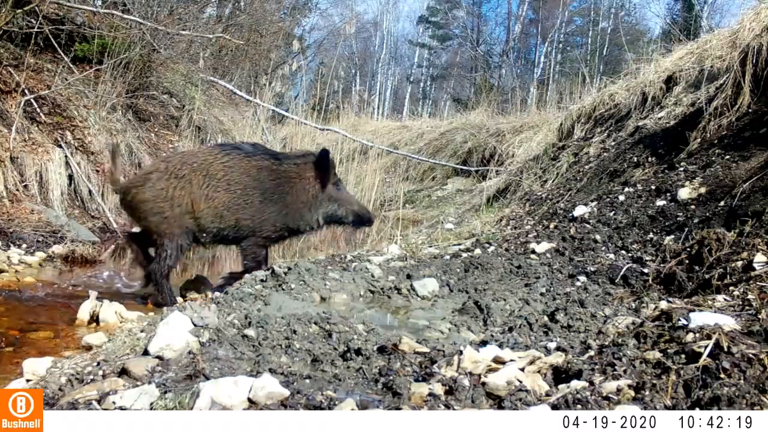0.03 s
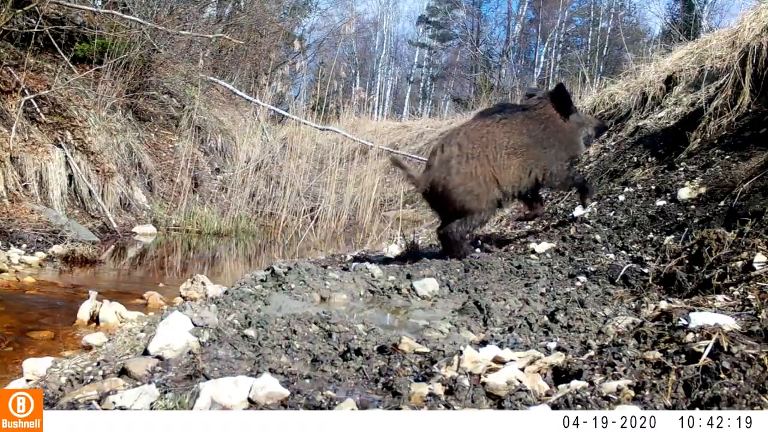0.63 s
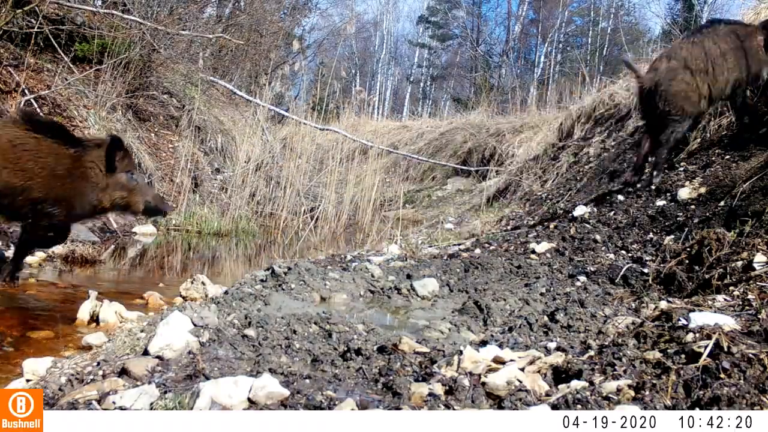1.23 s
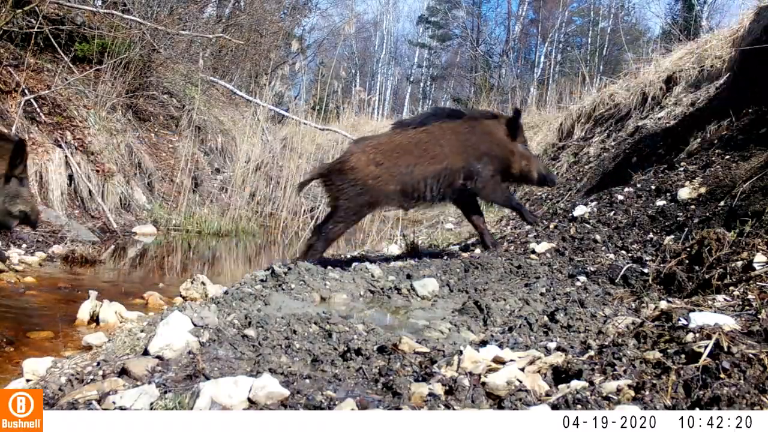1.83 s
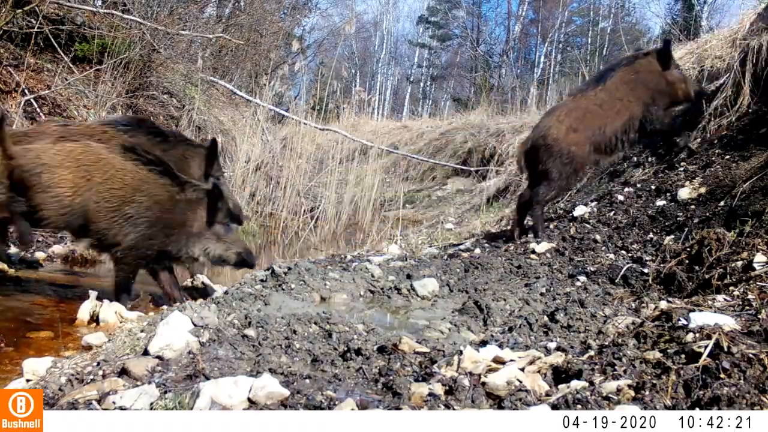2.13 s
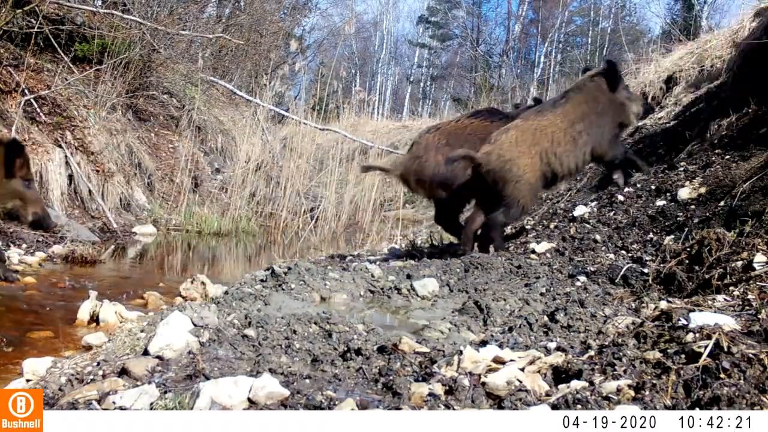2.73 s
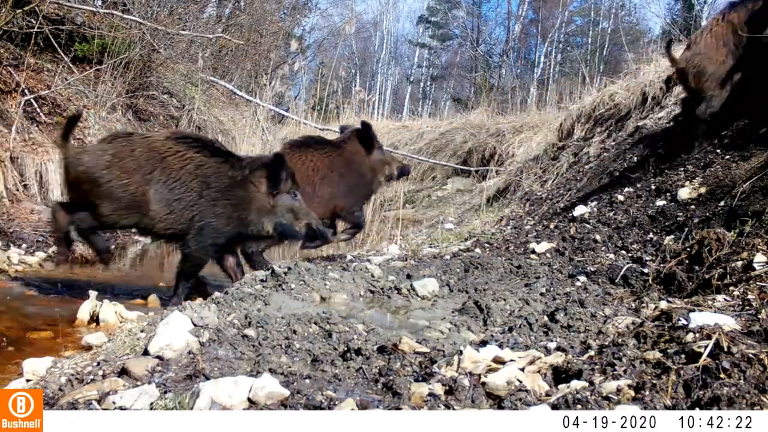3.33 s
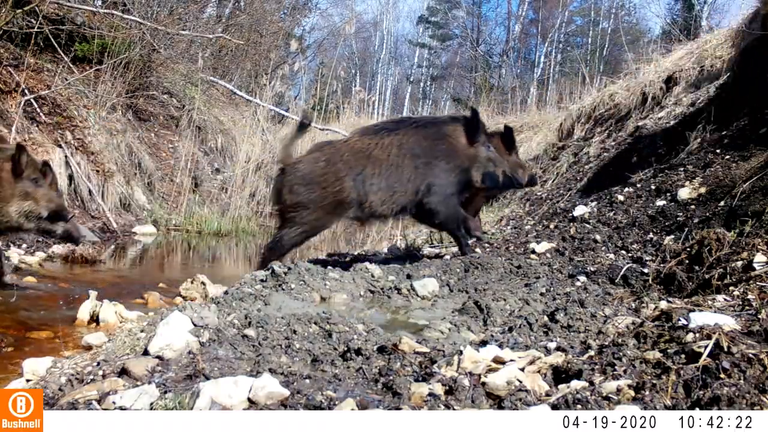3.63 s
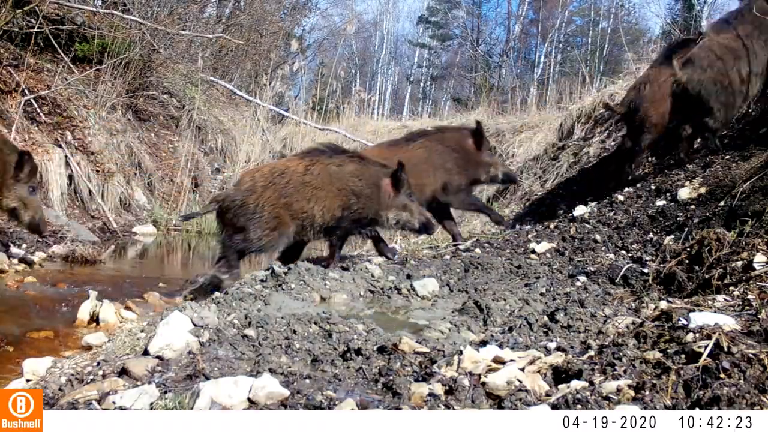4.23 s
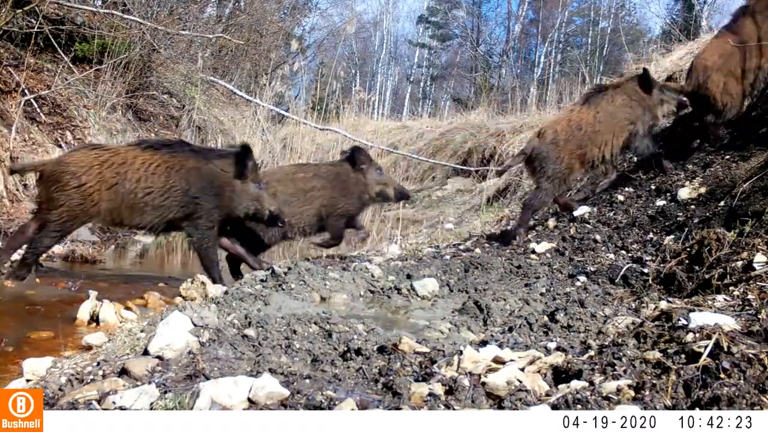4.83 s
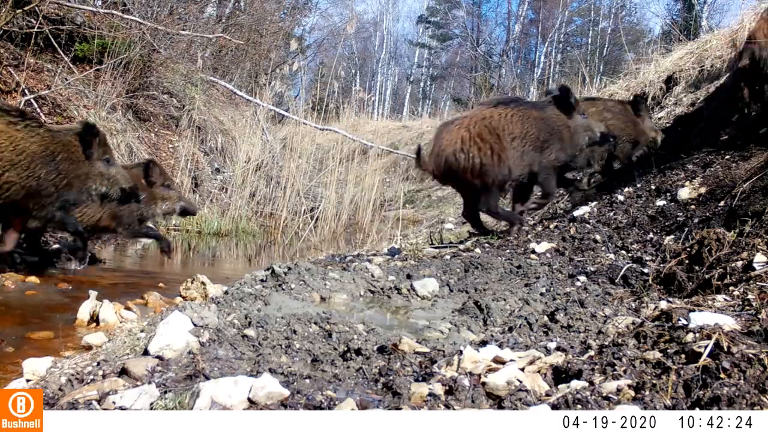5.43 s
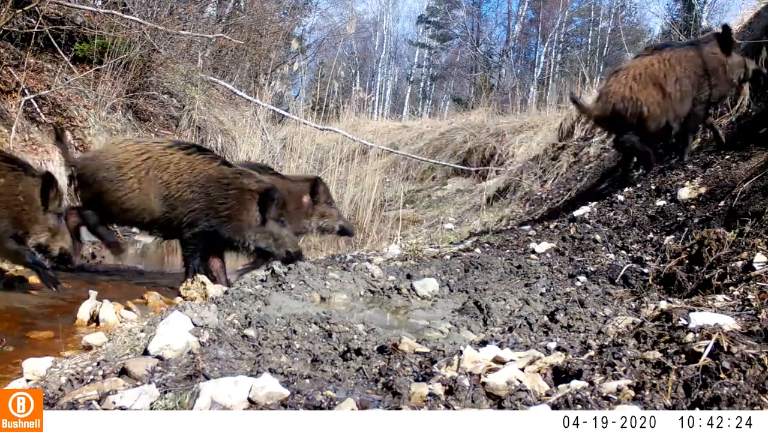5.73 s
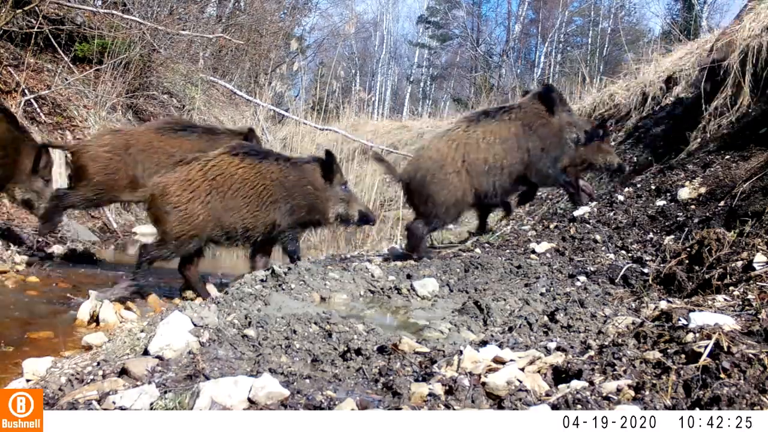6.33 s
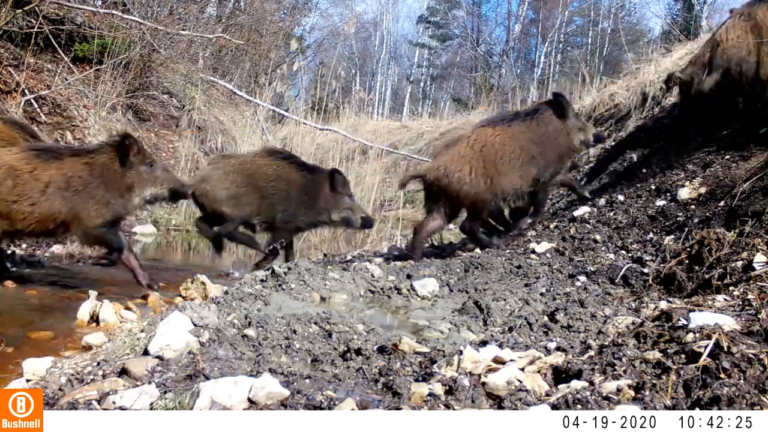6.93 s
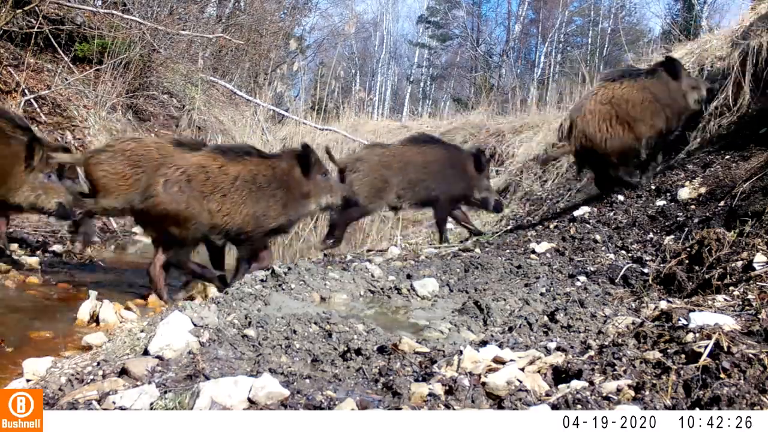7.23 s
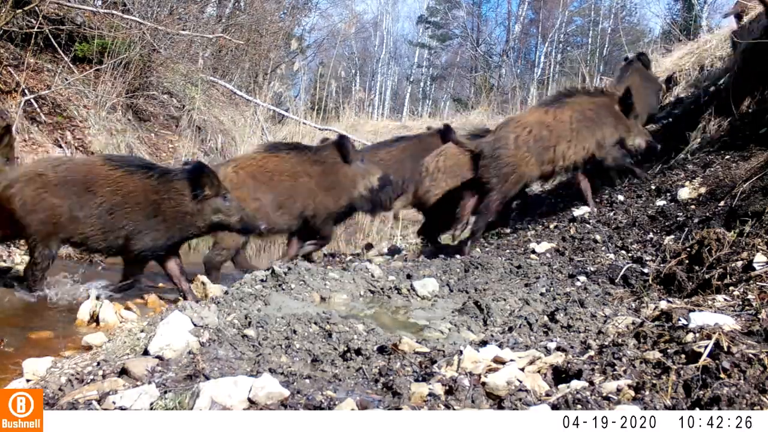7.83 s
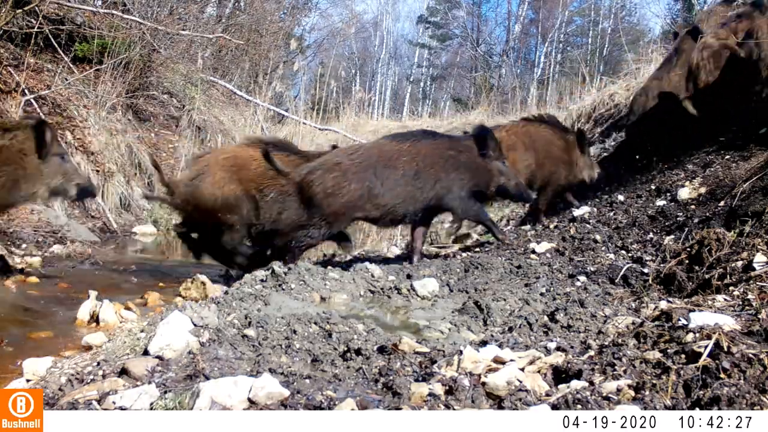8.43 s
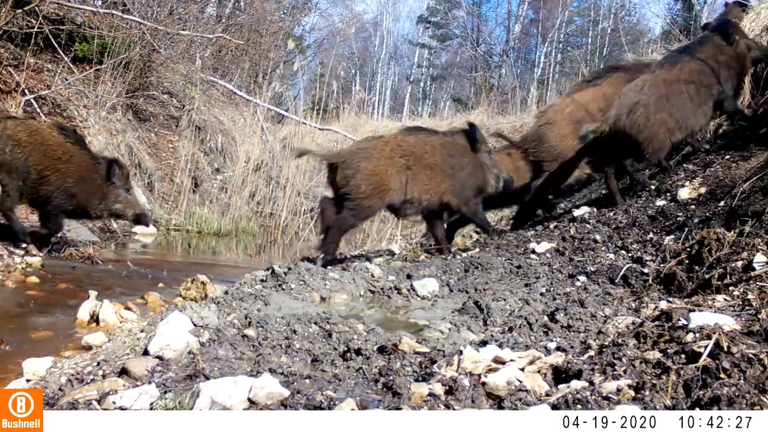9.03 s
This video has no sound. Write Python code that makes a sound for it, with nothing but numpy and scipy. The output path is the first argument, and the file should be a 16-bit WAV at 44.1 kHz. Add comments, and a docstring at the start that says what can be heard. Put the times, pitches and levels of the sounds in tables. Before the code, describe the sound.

Hooves clack on loose stones, plop and crunch as wild boar cross shallow water, over soft sloshing and faint hiss.

```python
"""A shallow stream under a gravel bank: a herd of wild boar trots through, close to a small trail camera.
Hooves knock stones together, plop into the water and thud into mud. Each clear step stirs up bubbles
and loose gravel, over the steady churning of the herd and a faint tremble of the ground.
The banks throw back short echoes; the camera's microphone is dull and its electronics hiss."""
import sys
import numpy as np
from scipy import signal
from scipy.fft import rfft, irfft
from scipy.io import wavfile
from scipy.ndimage import map_coordinates

SR = 44100
rng = np.random.default_rng(int(sys.argv[2]) if len(sys.argv) > 2 else 0)


def int16_out(signal):
    """Quantize to a 16-bit WAV file."""
    q = np.round(np.clip(np.atleast_2d(signal).T, -1, 1) * 32767)
    wavfile.write(sys.argv[1], SR, q.astype(np.int16))


N = 404838
TIME = np.arange(N) / SR

# Table levels are fader settings; a layer may add its own trim.
# hiss of the electronics: t/s, level/dB
HISS_LEVEL = [(0.1, -87), (0.56, -88), (0.62, -67), (0.68, -68.5), (0.8, -76), (1.0, -67.5), (2.0, -69),
              (4.3, -71.5), (5.5, -72.5), (6.3, -76.5), (7.7, -78.5), (9.18, -80.5)]
# the ground's steady tremble under the herd: t/s, level/dB
TREMBLE_LEVEL = [(0.3, -66), (0.89, -68), (5.74, -66), (9.15, -76)]
# a boar's weight jolts the ground nearby: t/s, level/dB, swell/s
GROUND_JOLTS = [(0.125, -56, 0.016), (0.597, -54, 0.018), (0.825, -59, 0.04), (0.95, -65, .04),
                (1.5, -63, 0.041), (1.742, -55, 0.014), (1.795, -55, 0.014), (2.892, -54, 0.0097),
                (3.355, -49, 0.0085)]
# EQ curves of the hiss, trembling ground, sloshing water and crunching gravel: f/Hz, level/dB
HISS_EQ = [(3000, -14), (6000, -7), (8200, 5.5), (10500, 6.5), (12500, 6.5), (15500, 4)]
TREMBLE_EQ = [(25, -11.5), (50, -4.5), (90, -5.5), (150, -4.5), (300, -12), (700, -33.5)]
WATER_EQ = [(30, -49), (70, -26), (130, -12.5), (200, -9), (330, -9.5), (500, -3), (750, -1.5), (1050, 3),
            (1400, -2), (2000, -10), (4000, -35)]
GRAVEL_EQ = [(500, -17.5), (1000, -8.5), (1400, -2.5), (1850, 1), (2400, -2.5), (3000, -1), (3800, -8),
             (4900, -11.5), (6000, -15.5), (8000, -4.5)]
# the herd's churning, which swells as more animals cross: t/s, water level/dB, gravel level/dB
CHURN_LEVELS = [(0.3, -50.5, -50.5), (1.28, -47, -47.5), (1.38, -43.5, -41), (1.85, -46, -46),
                (2.22, -39.5, -39), (2.89, -42.5, -40.5), (3.21, -42, -38), (3.43, -38, -41.5),
                (3.68, -43, -39.5), (3.92, -39, -38), (4.22, -40, -39), (4.64, -40, -38), (5.2, -41, -40),
                (6.04, -41.5, -41.5), (7.0, -45.5, -45.5), (8.34, -44.5, -44.5), (8.75, -47, -48),
                (9.15, -45.5, -46)]
# a boar pushes through the shallows or slips: middle t/s, half length/s, water level/dB, gravel level/dB
BOAR_LUNGES = [(0.143, 0.12, -49.5, -50), (0.718, 0.14, -44.5, -47.5), (0.955, 0.07, -43.5, -45),
               (1.215, 0.06, -39, -43), (1.345, 0.026, -37.5, -35.5), (1.634, 0.04, -45, -45),
               (2.344, 0.036, -51, -38), (3.182, 0.035, -44, -38), (3.692, 0.045, -38, -44),
               (4.27, 0.031, -42, -54), (4.391, 0.015, -59, -38), (4.815, 0.11, -41, -58),
               (5.724, 0.025, -41, -40.5), (5.96, 0.027, -44, -43), (6.046, 0.02, -36.5, -47),
               (6.138, 0.014, -38, -38), (6.72, 0.028, -39.5, -40.5), (6.868, 0.073, -43.5, -51),
               (7.32, 0.066, -44.5, -44.5), (7.753, 0.018, -39.5, -39.5), (7.912, 0.027, -37, -37.5),
               (8.183, 0.025, -37, -39.5), (8.553, 0.032, -41, -45.5), (8.77, 0.04, -45, -44.5),
               (8.93, 0.011, -48, -46)]
# a leg drags through the water: middle t/s, level/dB, bubble f/Hz, half length/s
LEG_GURGLES = [(1.247, -44, 500, 0.06), (1.359, -24, 1690, 0.014), (1.553, -33, 1210, 0.019),
               (2.175, -26, 1000, 0.022), (2.275, -27, 900, 0.034), (2.716, -35, 1000, 0.012),
               (3.101, -33.5, 555, 0.019), (3.11, -38, 1130, 0.021), (3.219, -26.5, 1102, 0.084),
               (3.945, -28, 898, 0.02), (4.062, -20.5, 1049, 0.014), (5.258, -29.5, 810, 0.024),
               (5.581, -25.5, 1372, 0.014), (5.849, -32, 910, 0.014), (5.924, -36.5, 533, 0.015),
               (6.206, -29, 1080, 0.035), (6.285, -29, 990, 0.016), (7.701, -32, 1117, 0.023),
               (7.806, -32, 730, 0.01), (7.909, -33.5, 1010, 0.031)]
# a hoof punches one air pocket into the water: t/s, level/dB, f/Hz
AIR_PLOPS = [(0.121, -40, 1000), (0.198, -42, 950), (0.484, -43.5, 443), (0.617, -38, 684),
             (0.675, -33.5, 930), (1.528, -25.5, 1050), (2.137, -29, 932), (2.169, -27.5, 936),
             (2.259, -32, 820), (3.035, -16, 1091), (3.102, -25, 1139), (3.453, -24.5, 1095),
             (3.838, -25, 1070), (3.967, -26, 860), (4.005, -26.5, 930), (4.089, -24, 915),
             (4.288, -28, 1090), (4.317, -27.5, 1180), (4.416, -28, 906), (4.474, -25, 1010),
             (4.519, -24, 626), (4.561, -25, 1200), (4.564, -26, 684), (4.785, -27, 986),
             (6.158, -20.5, 990), (6.198, -27, 850), (7.685, -22.5, 1106), (7.749, -28, 534),
             (7.753, -28, 1080), (7.806, -35, 1110), (7.924, -22.5, 1030), (8.325, -36, 1090),
             (8.417, -39, 1020)]
# a deep plunge throws up clods and water: t/s, level/dB, centre f/Hz, decay/s
DEEP_PLUNGES = [(4.247, -24.5, 1190, 0.014), (4.524, -25, 900, 0.017), (4.561, -25, 910, 0.01),
                (8.347, -30, 950, 0.0089)]
# a kicked pebble snaps against another: t/s, level/dB, f/Hz
KICKED_PEBBLES = [(1.1626, -25, 1460), (2.0264, -19, 3020), (3.027, -20, 1920), (3.339, -23, 2460),
                  (4.7704, -21, 2070), (4.953, -22, 1390), (5.5424, -20, 2890), (6.393, -31, 2200),
                  (6.531, -28, 1900), (6.5593, -25, 1830), (6.583, -28, 2000), (6.7067, -30, 1610),
                  (6.754, -25, 1510), (6.798, -26, 2100), (6.8643, -21, 2500), (7.42, -23, 1900),
                  (7.5069, -22, 3250), (7.5487, -26, 1916), (7.6428, -23, 1905), (7.773, -21.5, 3300),
                  (8.0117, -23.5, 1930), (8.0318, -30, 2410), (8.1717, -18.5, 1780), (8.327, -20, 1700),
                  (8.429, -23, 1300), (8.5549, -23, 1480), (8.606, -20, 2200), (8.6221, -22.5, 1440),
                  (8.7406, -24, 2110), (8.921, -27, 2600), (8.933, -26.5, 1390), (9.0501, -24, 2920)]
# a hoof tips a flat stone: t/s, level/dB, f/Hz, t60/s
TIPPED_STONES = [(0.6965, -32, 2400, 0.025), (3.157, -26, 5100, 0.044), (4.2428, -7, 2640, 0.013),
                 (4.5397, -26, 2940, 0.027), (7.548, -24, 3000, 0.023), (7.549, -32, 4450, 0.059),
                 (7.6835, -23, 2842, 0.035), (7.906, -26, 1830, 0.043), (8.356, -30, 2380, 0.027),
                 (8.403, -22.5, 2890, 0.018)]
# heavy footfalls in mud and soft ground: t/s, level/dB, final f/Hz
MUD_THUDS = [(0.617, -44, 110), (1.146, -36, 308), (1.678, -20.5, 462), (2.899, -24.5, 288),
             (3.361, -18.5, 230), (4.241, -7, 665), (6.039, -30.5, 260), (8.401, -18, 647)]
# the clearest steps on stone or in water: t/s, knock level/dB, f/Hz, grit and clack level/dB,
# spray level/dB relative to the knock
CLEAR_STEPS = [(0.129, -30.5, 1300, -46, -17), (0.229, -30, 1570, -39, -19), (0.405, -29.5, 1350, -47, -29),
               (0.696, -33, 1920, -27, -3), (1.342, -16.5, 1820, -24, -8.5), (1.526, -24.5, 1160, -49, 0),
               (1.575, -21.5, 1830, -50, -22), (1.799, -29, 1090, -36.5, -10),
               (1.902, -21.5, 1110, -34, -8.5), (1.908, -20, 1840, -45, -27),
               (1.939, -19.5, 1780, -47, -6.5), (2.018, -22, 1070, -38, -10),
               (2.024, -23.5, 945, -28.5, -19), (2.137, -26, 950, -36, -27), (2.157, -25, 1130, -47, -1),
               (2.32, -11, 1600, -29, -16), (2.849, -18, 2970, -47, -13), (2.997, -12, 1210, -31, -9),
               (3.035, -23.5, 1043, -22, -1), (3.045, -12.5, 1814, -20, -21), (3.154, -31, 2600, -21, -4),
               (3.184, -13.5, 3300, -23, -21), (3.237, -28, 1140, -26, -20), (3.36, -16, 984, -55, -12),
               (3.58, -20, 1940, -37, -27), (3.625, -32, 1050, -25.5, -21),
               (3.676, -17.5, 1900, -27.5, -16), (3.807, -19.5, 1130, -31, -3),
               (3.836, -14, 1446, -27, -32), (3.842, -6.5, 1800, -41, -11), (3.87, -14.5, 1854, -38, -16),
               (3.965, -17.5, 1580, -29, -1), (4.004, -20.5, 1080, -26.5, -2),
               (4.088, -15.5, 1150, -32, -10), (4.232, -22, 2900, -21, -26), (4.2412, 1.5, 1966, -34, -29),
               (4.301, -19, 2750, -27, -26), (4.316, -11, 2840, -42, -24), (4.433, -16.5, 1550, -35, -20),
               (4.5193, -9, 1015, -47, -12), (4.558, -13.5, 1190, -53, -19), (4.626, -19.5, 2007, -32, -11),
               (4.659, -14.5, 1830, -47, -11), (4.783, -14, 1980, -47, -16), (4.95, -21.5, 1270, -49, -7.5),
               (5.394, -22, 2800, -52, -26), (5.54, -27, 1447, -26, -26), (6.047, -31, 1200, -30.5, -12),
               (6.158, -29, 1082, -31, -1), (6.196, -15, 1820, -32, -9), (6.392, -48, 2250, -30, -17),
               (6.529, -33, 1940, -40, -2), (6.582, -21.5, 3420, -36, -18), (6.753, -31, 1050, -32.5, -19),
               (6.878, -31, 945, -31.5, -20), (6.927, -29.5, 1890, -47, -6), (7.1, -16, 1660, -38, -24),
               (7.116, -25, 1620, -31.5, -24), (7.265, -33, 1840, -34.5, -8), (7.313, -30, 970, -31.5, -11),
               (7.384, -23.5, 2870, -53, -33), (7.409, -30, 1160, -47, -26), (7.548, -16.5, 1510, -24, -22),
               (7.641, -24, 2200, -39, -9), (7.681, -32, 1079, -50, -13), (7.686, -21.5, 1600, -35, -7),
               (7.772, -31, 830, -41, -35), (7.803, -25, 1126, -44, -0.5), (7.904, -23, 1460, -41, -3.5),
               (8.012, -27.5, 890, -35.5, -2.5), (8.169, -15.5, 1860, -53, -30),
               (8.197, -16.5, 1850, -44, -13), (8.268, -25, 1110, -35, -2), (8.325, -25, 1060, -50, -25),
               (8.354, -23, 1880, -39, -27), (8.402, -15, 2650, -45, -24), (8.554, -30, 1560, -41, -4),
               (8.606, -20, 1740, -28, -12), (8.973, -24.5, 1530, -54, -21)]
STEP_REF_DB = -20  # a middling step; stirs and thumps are scaled from it


def from_db(db):
    """Decibels to gain."""
    return 10 ** (np.asarray(db) / 20)


def unit_rms(x):
    """Scale to unit power."""
    return x / np.sqrt(np.mean(x ** 2) + 1e-20)


def unit_peak(x):
    """Scale to unit height."""
    return x / (np.abs(x).max() + 1e-20)


def automation(rows):
    """Each level column of a timed table, drawn out to every sample."""
    times, *columns = np.transpose(rows)
    return [np.interp(TIME, times, column) for column in columns]


def equalise(x, curve):
    """Shape a steady sound with an EQ curve on a log-frequency axis; unit power."""
    hz, level_db = np.transpose(curve)
    bins_hz = np.maximum(np.fft.rfftfreq(N, 1 / SR), 1)
    gain = from_db(np.interp(np.log(bins_hz), np.log(hz), level_db))
    return unit_rms(irfft(rfft(x) * gain, N))


def butter(x, hz, kind, order=2):
    """Causal Butterworth filter."""
    sos = signal.butter(order, np.clip(hz, 10, .45 * SR), kind, fs=SR, output="sos")
    return signal.sosfilt(sos, x + 1e-18)


def drift(per_s):
    """Smooth random wander of unit power."""
    knots = rng.standard_normal(4096)
    return unit_rms(map_coordinates(knots, [TIME * per_s], order=1, mode="wrap"))


def add(out, start_s, sound):
    """Mix a sound in at a time."""
    at = int(np.clip(round(start_s * SR), 0, N - 1))
    out[at:at + len(sound)] += sound[:N - at]


def clicks(per_s, spread_db, size):
    """Random contacts: many faint ones, a few strong."""
    born = rng.random(size) < per_s / SR
    strength = from_db(spread_db * np.minimum(rng.exponential(1, size), 4))
    return born * strength * rng.choice([-1, 1], size)


def grains(per_s, spread_db, low_hz, high_hz, cycles, count=20):
    """Contacts dealt to resonators of many sizes, each dying by 60 dB in `cycles`; unit power."""
    contacts = clicks(per_s, spread_db, N)
    dealt_to = rng.integers(0, count, N)
    out = np.zeros(N)
    for k, hz in enumerate(np.geomspace(low_hz, high_hz, count)):
        radius = from_db(-60 * hz / (cycles * SR))
        feedback = [1, -2 * radius * np.cos(2 * np.pi * hz / SR), radius ** 2]
        out += np.sqrt(hz) * signal.lfilter([1, 0, -1], feedback, contacts * (dealt_to == k) + 1e-18)
    return unit_rms(out)


def ring(t, hz, t60):
    """One mode, dying by 60 dB in t60 seconds."""
    return np.sin(2 * np.pi * hz * t) * from_db(-60 * t / t60)


def knock(t, hz, swell_cycles):
    """A heavily damped ring that swells and dies within a few cycles."""
    age = t * hz / swell_cycles
    return unit_peak(age * np.exp(-age) * np.sin(2 * np.pi * hz * t))


def stone_clack(t, t60):
    """A struck stone rings in three unrelated modes, different for every stone."""
    modes_hz = np.exp(rng.uniform(np.log(1700), np.log(4200), 3))
    return unit_peak(sum(ring(t, hz, t60) for hz in modes_hz))


def ground_tremble():
    """The ground trembles faintly under the herd; each jolt swells and dies away."""
    t = np.arange(SR // 2) / SR
    envelope = from_db(automation(TREMBLE_LEVEL)[0] - 0.5)
    for start_s, level_db, swell_s in GROUND_JOLTS:
        add(envelope, start_s, from_db(level_db) * unit_peak(t * np.exp(-t / swell_s)))
    return envelope * equalise(rng.standard_normal(N), TREMBLE_EQ)


def churning(stir_db=-46, stir_follows=0.23, attack_s=0.0034, release_s=0.02):
    """Water and gravel faders in dB: steady churn, stirs after clear steps and lunges add in power."""
    stir_power, t = np.zeros(N), np.arange(SR // 3) / SR
    stir = unit_peak((1 - np.exp(-t / attack_s)) * np.exp(-t / release_s))
    for start_s, level_db, *_ in CLEAR_STEPS:
        strength = from_db(stir_db + stir_follows * (level_db - STEP_REF_DB))
        add(stir_power, start_s, (strength * stir) ** 2)
    water_db, gravel_db = automation(CHURN_LEVELS)
    water_power = from_db(water_db + 0.16) ** 2 + stir_power
    gravel_power = from_db(gravel_db - 0.55) ** 2 + stir_power
    for middle_s, half_s, slosh_db, crunch_db in BOAR_LUNGES:
        swell = np.exp(-np.minimum(np.abs(TIME - middle_s) / half_s, 10) ** 2)
        water_power += from_db(slosh_db) ** 2 * swell
        gravel_power += from_db(crunch_db) ** 2 * swell
    return 10 * np.log10(water_power), 10 * np.log10(gravel_power)


def water_bed(level_db):
    """Legs stir up bubbles in clumps, over a smooth wash; a few lone drips ring longer."""
    bubbles_per_s = 600 * from_db(3 * drift(25))
    bubbles = grains(bubbles_per_s, spread_db=-0.5, low_hz=260, high_hz=2167, cycles=12)
    drips = grains(per_s=45, spread_db=2.5, low_hz=666.5, high_hz=1863, cycles=68, count=28)
    wash = from_db(7) * rng.standard_normal(N)
    return from_db(level_db - 1.78) * equalise(bubbles + from_db(-6) * drips + wash, WATER_EQ)


def gravel_bed(level_db):
    """Grit ticks in little slides, lone pebbles click and falling droplets tinkle, over a rustle."""
    ticks_per_s = 2000 * from_db(4.1 * drift(45))
    ticks = grains(ticks_per_s, spread_db=2.5, low_hz=882, high_hz=7090, cycles=21.6)
    pebbles = unit_rms(butter(clicks(41, 1.4, N), [800, 6000], "band"))
    droplets = grains(per_s=120, spread_db=2, low_hz=1533, high_hz=5347, cycles=170, count=36)
    rustle = from_db(3) * rng.standard_normal(N)
    mix = ticks + from_db(-15.5) * pebbles + from_db(-8.5) * droplets + rustle
    return from_db(level_db + 3.5) * equalise(mix, GRAVEL_EQ)


def bank_echoes(x, t60=0.22, predelay_s=0.004):
    """Stones and earth banks scatter a short, dull cloud of echoes."""
    t = np.arange(SR // 3) / SR
    echoes = clicks(1700, 1.3, len(t)) * from_db(-60 * t / t60) * (t > predelay_s)
    echoes = butter(echoes / np.sqrt(np.sum(echoes ** 2)), 3800, "low")
    return from_db(-14.5) * signal.fftconvolve(x, echoes)[:N]


def gurgles(per_s=170, cycles=28, rise=0.041, size_spread=0.16):
    """Each leg stroke traps a cluster of like-sized bubbles, whose pitch rises as they surface."""
    out, t = np.zeros(N), np.arange(SR // 16) / SR
    for middle_s, level_db, hz, half_s in LEG_GURGLES:
        for offset_s in np.arange(-1.5 * half_s, 1.5 * half_s, 1 / per_s):
            turns = t * hz * np.exp(size_spread * rng.standard_normal())
            tone = np.sin(2 * np.pi * turns * (1 + rise * turns / cycles))
            envelope = from_db(-60 * turns / cycles) * (1 - np.exp(-turns))
            gain = from_db(level_db + 1.5) * np.exp(-.5 * (offset_s / half_s) ** 2)
            jitter_s = rng.uniform(-1.055, 0) / per_s
            add(out, middle_s + offset_s + jitter_s, gain * envelope * tone)
    return out


def plops(swell_cycles=2.4, rise=0.018):
    """An air pocket swells, rings with one clear pitch that creeps upward, and dies."""
    out, t = np.zeros(N), np.arange(SR // 12) / SR
    for start_s, level_db, hz in AIR_PLOPS:
        age = t * hz / swell_cycles
        turns = np.cumsum(hz * (1 + rise * (1 - np.exp(-age / 2)))) / SR
        plop = unit_peak(age * np.exp(-age) * np.sin(2 * np.pi * turns))
        add(out, start_s, from_db(level_db) * plop)
    return out


def plunges(per_s=3000, band_ratio=1.3, attack_s=0.00084):
    """Thrown clods and water land in a dense, coarse patter that fades quickly."""
    out, t = np.zeros(N), np.arange(SR // 8) / SR
    for start_s, level_db, hz, decay_s in DEEP_PLUNGES:
        patter = unit_rms(butter(clicks(per_s, 0.8, len(t)), [hz / band_ratio, hz * band_ratio], "band"))
        envelope = (1 - np.exp(-t / attack_s)) * np.exp(-t / decay_s)
        add(out, start_s, from_db(level_db) * patter * envelope)
    return out


def pebble_snaps():
    """Stone on stone: a snap of a cycle or two, and a faint clack ringing on."""
    out, t = np.zeros(N), np.arange(SR // 20) / SR
    for start_s, level_db, hz in KICKED_PEBBLES:
        snap = knock(t, hz, swell_cycles=0.33) + from_db(-14.5) * stone_clack(t, t60=0.018)
        add(out, start_s, from_db(level_db) * snap)
    return out


def flat_stones(overtone_ratio=1.51, contact_s=0.00012):
    """A tipped flat stone rings in two modes; the upper one is fainter and lasts a touch longer."""
    out, t = np.zeros(N), np.arange(SR // 10) / SR
    for start_s, level_db, hz, t60 in TIPPED_STONES:
        modes = ring(t, hz, t60) + from_db(-14) * ring(t, hz * overtone_ratio, t60 * 1.03)
        add(out, start_s, from_db(level_db) * unit_peak(modes * (1 - np.exp(-t / contact_s))))
    return out


def mud_footfalls(glide=2.09, glide_s=0.003, swell_s=0.0028, soil_s=0.0021):
    """A hoof sinks in mud: a gulp that falls as the hole deepens, crumbling soil, the weight's thump."""
    out, t = np.zeros(N), np.arange(SR // 6) / SR
    for start_s, level_db, hz in MUD_THUDS:
        turns = np.cumsum(hz * (1 + glide * np.exp(-t / glide_s))) / SR
        gulp = unit_peak(t * np.exp(-t / swell_s) * np.sin(2 * np.pi * turns))
        crumble = butter(rng.standard_normal(len(t)), [hz * 0.67, hz * 1.03], "band")
        soil = unit_peak(crumble * np.exp(-t / soil_s))
        thump_db = -52 + 0.2 * (level_db - STEP_REF_DB)
        add(out, start_s, from_db(level_db - 10.5) * (gulp + soil))
        add(out, start_s, from_db(thump_db) * knock(t, hz=130, swell_cycles=0.5))
    return out


def light_steps(per_s=3.8, low_hz=875, high_hz=2600, count=60):
    """Lighter steps fall at random, as strong as the gravel is busy; rows like CLEAR_STEPS."""
    gap, strength, pitch = rng.random((count, 3)).T
    times = np.cumsum(2 * gap / per_s)
    _, gravel_db = automation(CHURN_LEVELS)
    level_db = np.interp(times, TIME, gravel_db) + 15 * (strength - .5)
    hz = low_hz * (high_hz / low_hz) ** pitch
    knock_db, grit_db, spray_db = level_db + 9.5, level_db - 3, np.full(count, -18)
    return np.column_stack([times, knock_db, hz, grit_db, spray_db])[times < TIME[-1]]


def hooves(steps, press_s=0.00079, sink_s=0.00086, rock_s=0.002433, grit_s=0.0057, spray_s=0.025):
    """A hoof sinks through grit and knocks on a stone, which rings and rocks back once; bits spray."""
    out, t = np.zeros(N), np.arange(SR // 6) / SR
    pressing = 1 - np.exp(-t / press_s)  # the weight comes on
    settling = np.exp(-t / grit_s) + from_db(2.5) * np.exp(-t / spray_s)  # a quick shower, then a tail
    for start_s, knock_db, hz, grit_db, spray_db in steps:
        tail = from_db(-15) * ring(t, hz, t60=0.016)
        hollow = from_db(-21.5) * knock(t, hz * 0.59, swell_cycles=0.64)
        hit = unit_peak(knock(t, hz, swell_cycles=1) + tail + hollow)
        spray = unit_rms(butter(clicks(1600, 0.57, len(t)), [hz * 0.75, hz * 1.65], "band"))
        grit = unit_rms(butter(clicks(2700, 4.8, len(t)), [1750, 4000], "band"))
        hit_s = start_s + sink_s
        add(out, hit_s, from_db(knock_db - 3) * hit)
        add(out, hit_s, from_db(grit_db - 2) * stone_clack(t, t60=0.038))
        rebound_s = hit_s + rock_s * rng.uniform(0.588, 1.373)
        rebound = knock(t, hz * rng.uniform(0.66, 1.34), swell_cycles=0.91)
        add(out, rebound_s, from_db(knock_db - 10) * rebound)
        add(out, start_s, from_db(knock_db + spray_db - 11.5) * spray * settling * pressing)
        add(out, start_s, from_db(grit_db - 1.5) * grit * np.exp(-t / grit_s) * pressing)
    return out


def scene():
    """Mono mix: steps and their echoes over churned water, gravel and the trembling ground."""
    hits = hooves(CLEAR_STEPS) + pebble_snaps() + flat_stones()
    hits += plunges() + plops() + gurgles() + hooves(light_steps())
    steps = butter(hits, 170, "high")  # small stones and bubbles radiate no bass
    steps += mud_footfalls()
    water_db, gravel_db = churning()
    mix = steps + bank_echoes(steps) + water_bed(water_db) + gravel_bed(gravel_db) + ground_tremble()
    return mix[None]


def record(dry, wake_s=0.073, fade_s=0.046, full_scale=0.97, cutoff_hz=15900):
    """A dull microphone overloads on the hardest knock; hiss, a fade-in as the camera wakes, a top cut."""
    hiss = from_db(automation(HISS_LEVEL)[0]) * equalise(rng.standard_normal(N), HISS_EQ)
    dulled = butter(dry, 4814, "low", order=6)
    treble_leak = from_db(-31.5) * butter(dry, 7000, "high")
    fade_in = np.clip((TIME - wake_s) / fade_s, 0, 1) ** 2
    heard = np.clip(dulled + treble_leak + hiss, -full_scale, full_scale) * fade_in
    top_cut = signal.ellip(10, .3, 70, cutoff_hz, fs=SR, output="sos")
    return signal.sosfilt(top_cut, heard)


dry = scene()
out = record(dry)
int16_out(out)
```